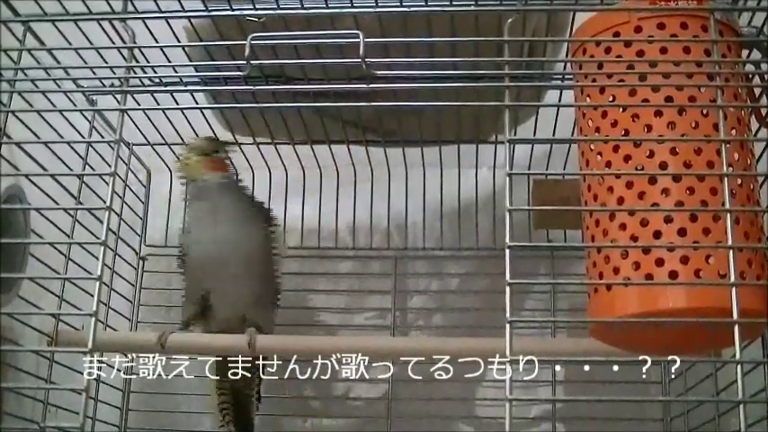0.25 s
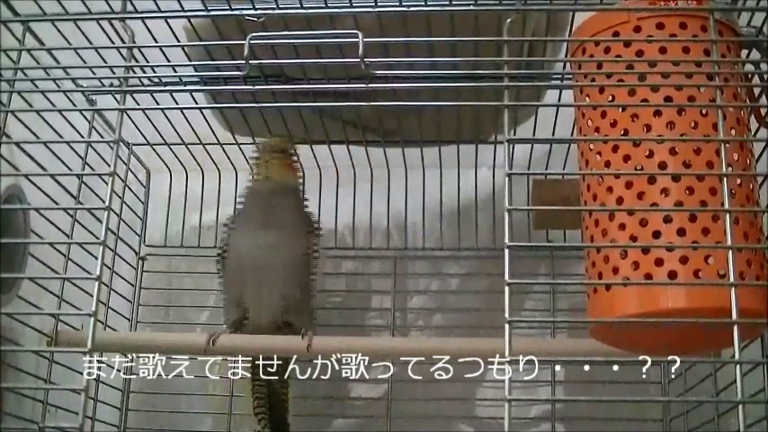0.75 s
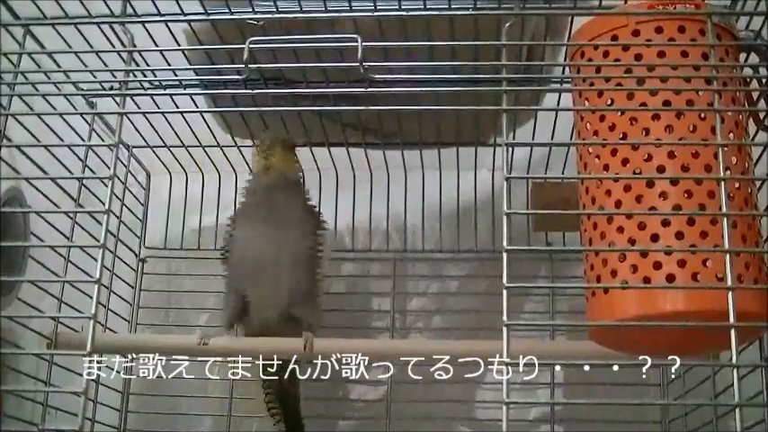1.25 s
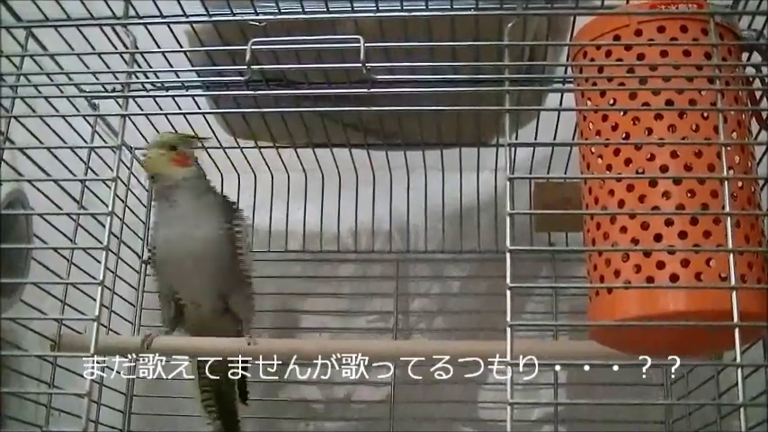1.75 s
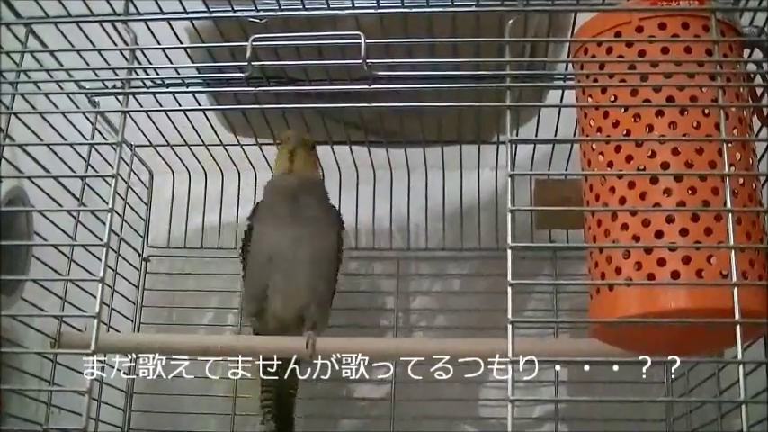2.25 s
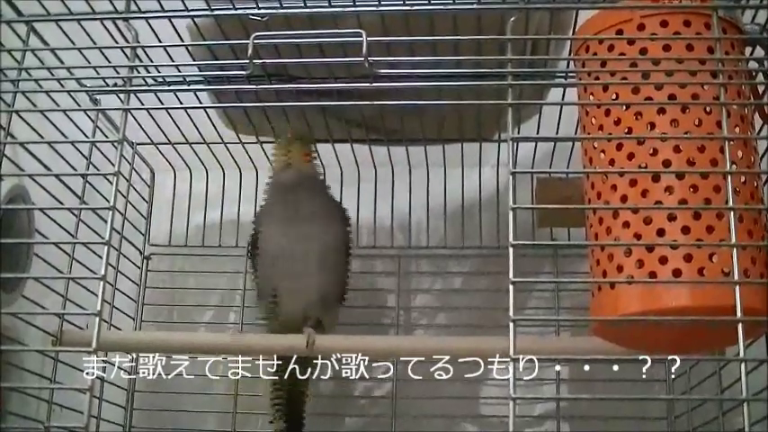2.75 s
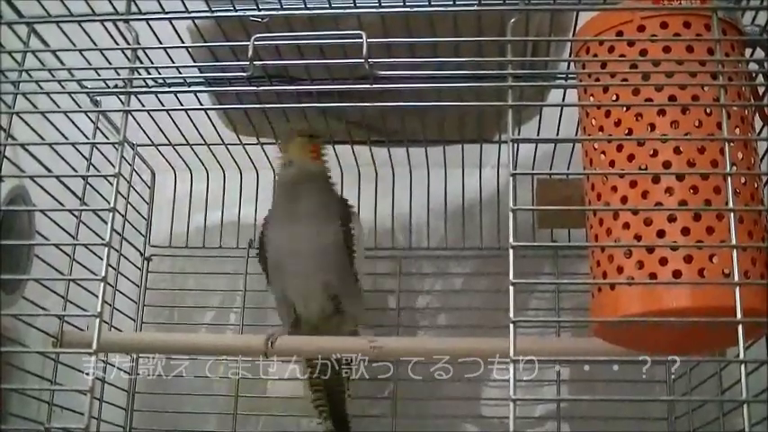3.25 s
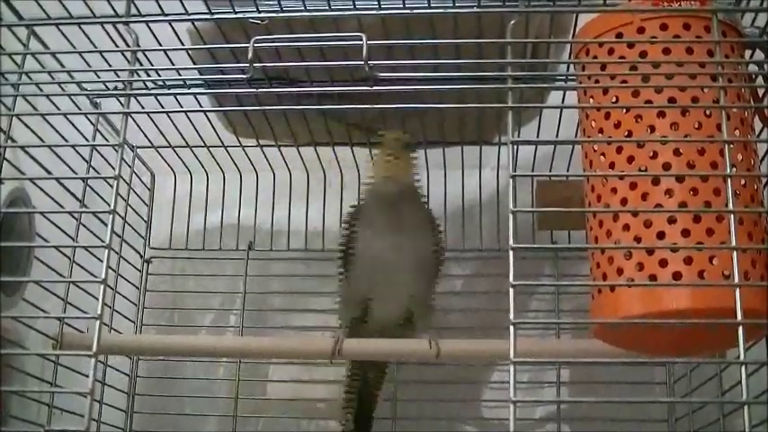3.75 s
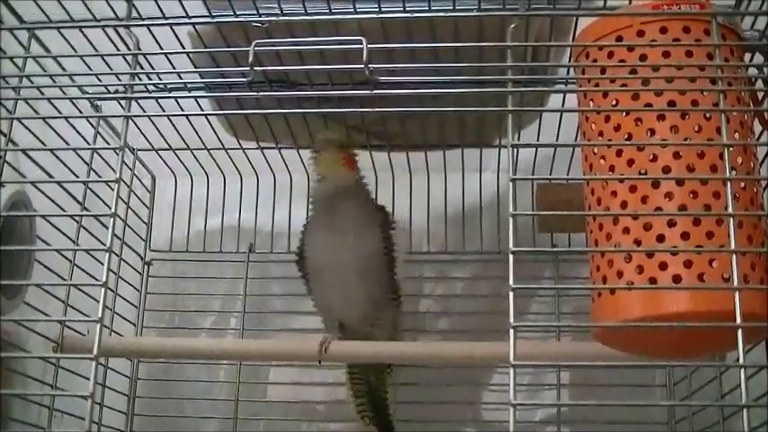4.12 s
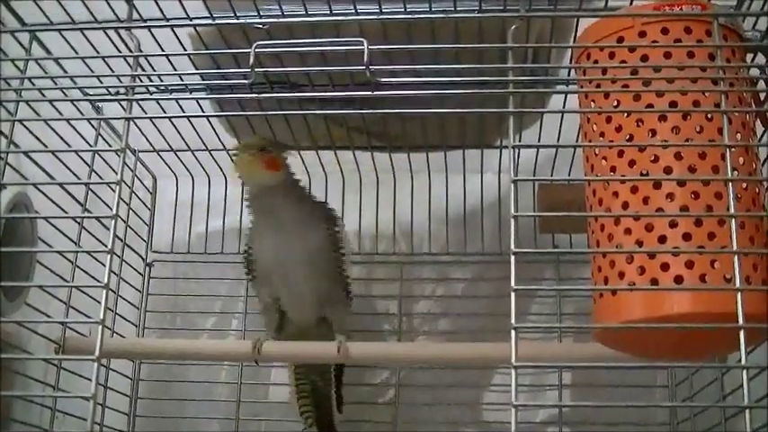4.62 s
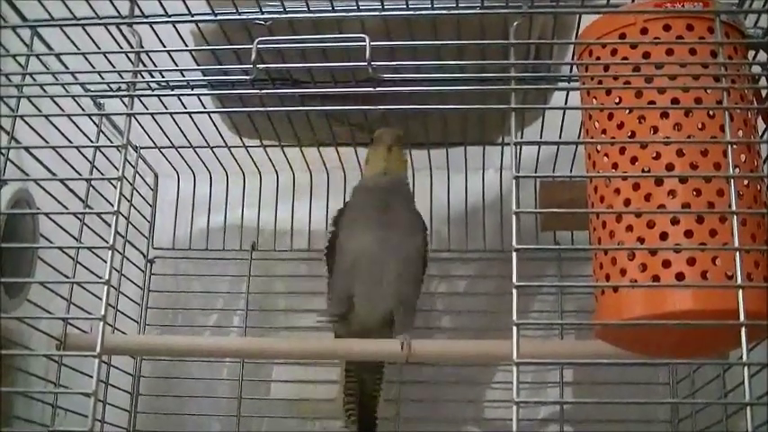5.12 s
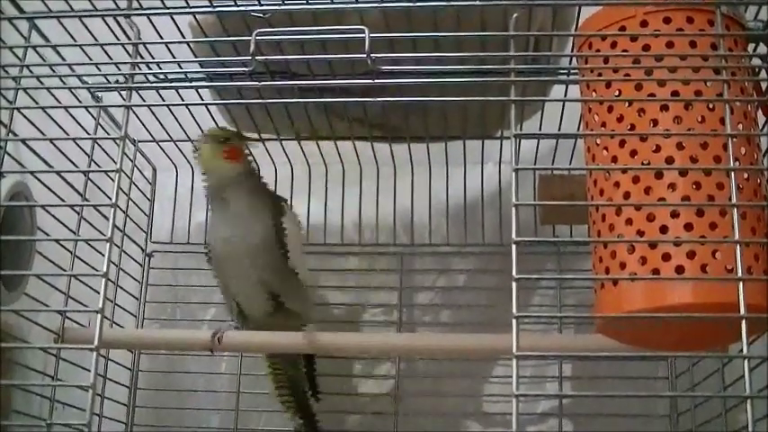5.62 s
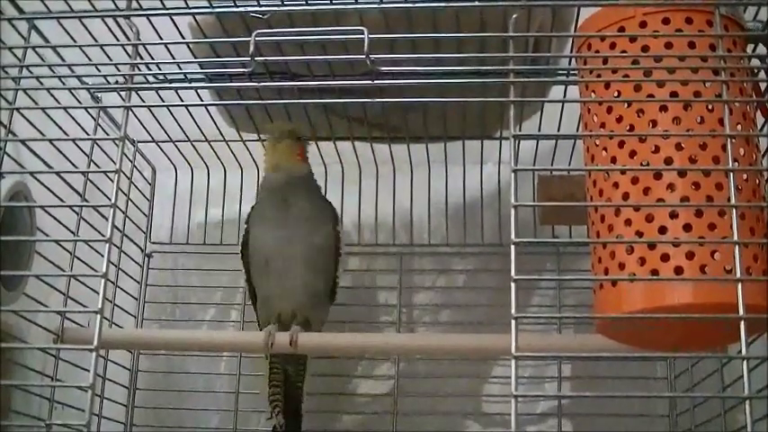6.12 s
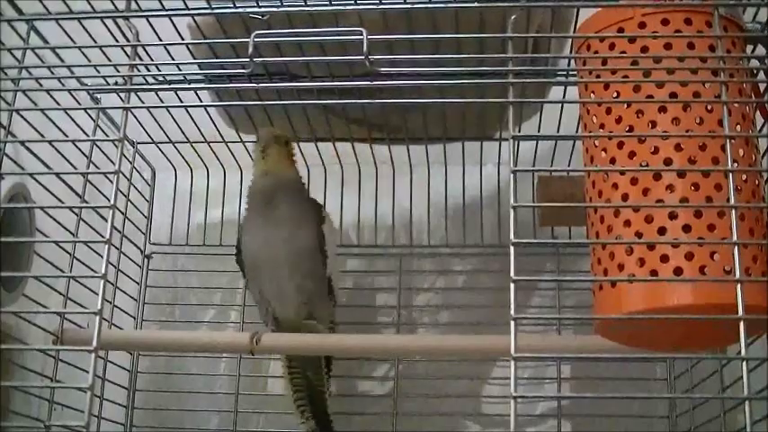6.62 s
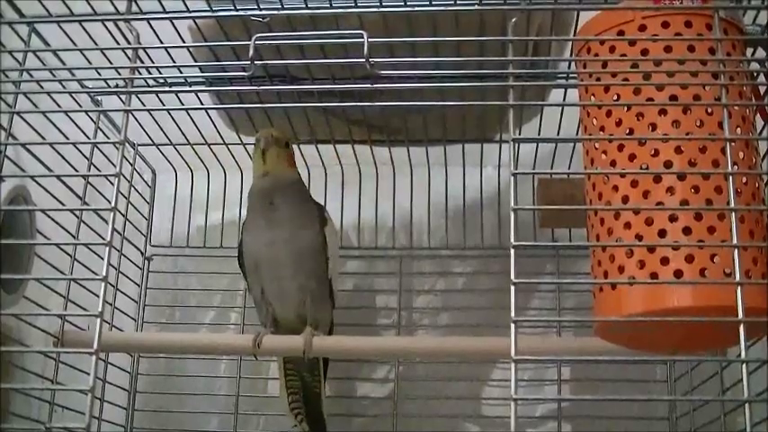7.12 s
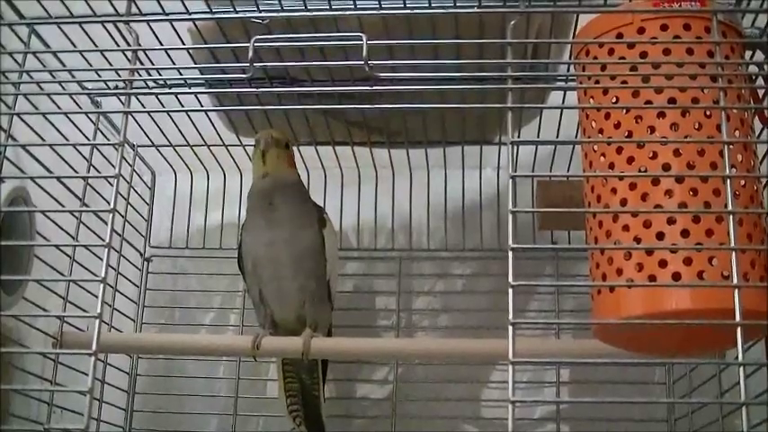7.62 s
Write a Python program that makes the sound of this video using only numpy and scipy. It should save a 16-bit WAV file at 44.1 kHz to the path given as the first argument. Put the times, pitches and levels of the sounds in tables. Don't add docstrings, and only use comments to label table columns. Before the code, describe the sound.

Spaced single bird whistles, low and sliding at first, then higher and brighter with quick downward flicks, amid faint claw ticks and room hum.

```python
import sys
import numpy as np
from scipy import signal
from scipy.fft import rfft, irfft
from scipy.io import wavfile
from scipy.ndimage import uniform_filter1d

SR = 44100
rng = np.random.default_rng(int(sys.argv[2]) if len(sys.argv) > 2 else 0)


def to_wav(s):
    ch = np.atleast_2d(s).T
    pcm = np.round(np.clip(ch, -1, 1) * 32767)
    wavfile.write(sys.argv[1], SR, pcm.astype(np.int16))


def undo_db(level):
    steps = np.asarray(level, float) / 20
    return 10 ** steps


N = 347177


def rms_one(x):
    return x / np.sqrt(np.mean(x ** 2, axis=-1, keepdims=True) + 1e-20)


def at_hz(points, hz):
    point_hz, value = np.array(points).T
    return np.interp(np.log(hz), np.log(point_hz), value)


def bump(t, at_s, half_width_s):
    return np.exp(-.5 * ((t - at_s) / half_width_s) ** 2)


def drift(rate_hz, count):
    r = np.exp(-2 * np.pi * rate_hz / SR)
    wander = signal.lfilter([1], [1, -2 * r, r * r], rng.standard_normal(16000))
    return rms_one(wander[3000:3000 + count])


def resonance(x, hz, width_hz):
    r = np.exp(-np.pi * width_hz / SR)
    return signal.lfilter([1, 0, -1], [1, -2 * r * np.cos(2 * np.pi * hz / SR), r * r], x)


def bird():
    # start_s, pitch_hz, level_db
    low_slides = [
        [(1.875, 1281, -34), (1.9, 1391, -37.5), (1.954, 1782, -19), (1.986, 1998, -21.5), (2.03, 2008, -20.5),
         (2.07, 1925, -17), (2.116, 1889, -23)],
        [(2.402, 2405, -27), (2.424, 2254, -22), (2.436, 2227, -17), (2.455, 2183, -13.5), (2.49, 2101, -14),
         (2.517, 2108, -16.5)],
        [(2.812, 2337, -22), (2.832, 2156, -12.5), (2.865, 1962, -19.5), (2.885, 1925, -15.5),
         (2.944, 1930, -20)],
        [(3.656, 2040, -21), (3.692, 2058, -15), (3.75, 1974, -17.5), (3.785, 1929, -19), (3.8, 2088, -21)],
    ]
    held_notes = [
        [(3.214, 2580, -16.5), (3.235, 2443, -9.5), (3.246, 2506, -20), (3.266, 2467, -20)],
        [(4.115, 2655, -19), (4.152, 2488, -31), (4.159, 2526, -17.5), (4.19, 2630, -22.5), (4.234, 2540, -21),
         (4.239, 2463, -11), (4.272, 2009, -20), (4.288, 1513, -34)],
        [(4.502, 2626, -20), (4.534, 2460, -16.5), (4.565, 2458, -18), (4.622, 2580, -12), (4.648, 2498, -28.5)],
        [(4.91, 2454, -15), (4.95, 2380, -15), (4.98, 2418, -9), (5.003, 2367, -18.5), (5.024, 2362, -11),
         (5.056, 2004, -23)],
    ]
    arches = [
        [(5.286, 2390, -13), (5.325, 2377, -10.5), (5.345, 2416, -11), (5.372, 2766, -15.5), (5.402, 2425, -32)],
        [(5.703, 2401, -24), (5.752, 2439, -15), (5.784, 2680, -18.5), (5.812, 2765, -15), (5.896, 2590, -14),
         (5.905, 2466, -27.5)],
        [(6.183, 2361, -19.5), (6.226, 2260, -21.5), (6.25, 2459, -12.5), (6.292, 2518, -14.5),
         (6.32, 2404, -20.5), (6.342, 2128, -14), (6.357, 2137, -25.5)],
    ]
    # overtones_db, gain_start_to_end_db, mid_swell_db, treble_db_per_octave, tremor_share
    voices = [(-5, -6, 17, -6, .008), (-1, -8, -3.5, -8, .0141), (0.5, -1.5, -4, -5, .015),
              (-3.5, 12, -2.5, 2.5, .012), (-17, 8, 21.5, -6.5, 0.011), (0.5, -5, -2.5, 3, 0.014),
              (-6.5, 5, 7, 2.5, 0.01), (-2.5, 5.5, -5, 5, 0.0087), (-5.5, 2.5, -2.5, 6, 0.018),
              (-6.5, -0.5, 2, 8, 0.0057), (0.5, -2.5, -7.5, 11.5, 0.0046)]
    # length_s, last_pitch_hz, level_step_db
    flicks = [(0.015, 1900, -13), (0.0079, 1750, -5.5), (0.019, 1720, -9.5), (0.0088, 2300, -17),
              (0.0052, 2100, 2), (0.00086, 1400, -1), (0.01094, 1700, 2), (0.0095, 1600, 0),
              (0.0081, 2100, 6.5), (0.013, 1800, 2), (0.0075, 1612, 0.5)]
    out = np.zeros(N)
    for rows, voice, flick in zip(sorted(low_slides + held_notes + arches), voices, flicks):
        first, sound = call(rows, voice, flick)
        out[first:first + len(sound)] = sound
    return signal.sosfilt(signal.butter(3, 1050, "high", fs=SR, output="sos"), out)


def call(rows, voice, flick):
    # start_s, length_s, share
    doubling = [(1.89, .012, 0.15), (3.214, .014, 0.15), (4.115, .1, 0.04), (4.503, .022, 0.1),
                (4.912, .02, 0.03), (5.705, .022, 0.08)]
    # at_s, half_width_s, depth
    rasps = [(1.898, 0.0036, 0.45), (1.979, 0.025, 0.088), (3.26, 0.0093, 0.11), (4.12, .004, 0.4),
             (4.157, .004, 0.52), (4.2, .012, 0.059), (4.51, .006, .1), (4.966, .012, 0.08),
             (6.236, .005, 0.067)]
    start_s, end_s = rows[0][0], rows[-1][0]
    first, t, hz, level_db = contour(rows, flick)
    hz = hz * (1 + voice[-1] * drift(90, len(t)))
    phase = 2 * np.pi * np.cumsum(hz) / SR

    half = 0
    for at_s, length_s, share in doubling:
        half = half + share * np.sin(np.pi * np.clip((t - at_s) / length_s, 0, 1)) ** .5
    tone = np.sin(phase) + half * undo_db(-16) * np.sin(phase / 2)
    tone = tone + overtones(t, start_s, end_s, hz, phase, level_db, half, voice)

    breath_db = -40
    rough = undo_db(breath_db) + 0.033 * bump(t, end_s + flick[0] / 2, .004)
    for at_s, half_width_s, depth in rasps:
        rough = rough + depth * bump(t, at_s, half_width_s)
    tone = tone * (1 + rough * drift(430, len(t)))
    edge = np.clip(np.minimum((t - t[0]) / 0.002, (t[-1] - t) / 0.005), 0, 1)
    return first, np.sqrt(2) * undo_db(level_db) * edge * tone


def contour(rows, flick):
    # at_s, drop_hz, half_width_s, dip_db
    gulps = [(1.976, 222, 0.0037, -12.5), (1.999, 342.5, .005, -14), (2.021, 207.4, .0035, 2),
             (2.46, 59.6, 0.0052, 5), (2.471, 46.05, 0.002, -7), (2.863, 49.8, .003, 1.5),
             (3.25, 573, .0026, -5), (3.263, 517, 0.0024, -6.5), (4.253, 108.6, 0.0035, -8.5),
             (4.595, 60.3, 0.0015, -8.5), (4.606, 59.4, 0.0034, -10), (4.955, 169.3, .004, -9),
             (4.972, 222, 0.0035, -5.5), (6.232, 259.1, .004, -4)]
    # at_s, half_width_s, dip_db
    breaks = [(2.507, 0.0036, -3), (2.843, 0.0018, -6), (2.868, .003, -3), (3.709, 0.0029, -15),
              (3.722, 0.0027, -13.5), (3.737, 0.0016, -8.5), (3.792, 0.0024, -12), (4.129, 0.0068, -12),
              (4.175, 0.0071, -13), (4.206, 0.0061, -11), (4.532, .0039, -10.5), (4.641, 0.0045, -6),
              (5.033, .002, -12), (5.348, .0073, -13.5), (5.768, 0.0022, -10), (5.791, .003, -10),
              (5.845, .0052, -15), (6.262, 0.006, -21.5), (6.277, 0.0046, -10)]
    scoop_s, scoop_share, scoop_db, fade_db = .014, 0.066, -15.5, -5
    flick_s, last_hz, flick_db = flick
    start_s, aim_hz, aim_db = rows[0]
    end_s, end_hz, end_db = rows[-1]
    scoop = [(start_s, aim_hz * (1 - scoop_share), aim_db + scoop_db),
             (start_s + scoop_s, aim_hz, aim_db)]
    slack = [(end_s + flick_s / 4, min(1.15 * last_hz, end_hz), end_db + flick_db),
             (end_s + flick_s, last_hz, end_db + flick_db + fade_db)]
    point_s, point_hz, point_db = np.transpose(scoop + list(rows[1:]) + slack)

    first = round(point_s[0] * SR)
    t = np.arange(first, round(point_s[-1] * SR)) / SR
    hz = uniform_filter1d(np.interp(t, point_s, point_hz), size=110, mode="nearest")
    level_db = np.interp(t, point_s, point_db)
    for at_s, drop_hz, half_width_s, dip_db in gulps:
        catch = bump(t, at_s, half_width_s)
        hz = hz - drop_hz * catch
        level_db = level_db + dip_db * catch
    for at_s, half_width_s, dip_db in breaks:
        level_db = level_db + dip_db * bump(t, at_s, half_width_s)
    return first, t, hz, level_db


def overtones(t, start_s, end_s, hz, phase, level_db, half, voice):
    # overtone_hz, level_re_fundamental_db
    throat = [(2400, -1.5), (3100, -4.5), (3800, -13), (4300, -14), (5200, -25.5), (6200, -30), (7000, -27),
              (7700, -26), (8500, -39), (9600, -43.5), (11500, -39), (13500, -37.5), (15500, -48)]
    bright_db, gain_db, swell_db, treble_db, _ = voice
    scoop_dull_db, dull_share = -10, .11
    along = np.clip((t - start_s) / (end_s - start_s), 0, 1)
    after_end = t > end_s
    bright_db = bright_db + gain_db * (along - .5) + swell_db * np.sin(np.pi * along) - 3 * after_end
    bright_db = bright_db + scoop_dull_db * np.clip(1 - along / dull_share, 0, 1) ** .5
    treble_db = treble_db - 12 * after_end
    weak_db = np.minimum(level_db + 35.5, 0)

    out = np.zeros(len(t))
    for k in np.arange(3, 21) / 2:
        line_hz = k * hz
        octaves = np.clip(np.log2(line_hz / 7800), 0, 1)
        line_db = at_hz(throat, line_hz) + bright_db + treble_db * octaves + 0.014 * k * weak_db
        line_db = line_db + 2.84 * drift(40, len(t))
        size = undo_db(line_db) * (line_hz < 15600)
        if k % 1:
            size = size * half * undo_db(15.5)
        out += size * np.sin(k * phase + rng.uniform(0, 2 * np.pi))
    return out


def claws():
    # start_s, peak_db, centre_hz, width_hz, t60_s
    ticks = [
        (0.025, -54.5, 1650, 1110, 0.16),
        (0.608, -60, 4500, 2500, 0.033),
        (2.805, -48.5, 3200, 2550, 0.078),
        (3.908, -61, 6000, 7900, 0.12),
        (7.454, -65.5, 2800, 3000, 0.062),
    ]
    out, t = np.zeros(N), np.arange(6000) / SR
    for start_s, peak_db, hz, width_hz, t60_s in ticks:
        burst = rms_one(resonance(rng.standard_normal(len(t)), hz, width_hz))
        burst = burst * undo_db(-60 * t / t60_s) * np.clip(t / 0.0018, 0, 1)
        first = round(start_s * SR)
        out[first:first + len(t)] += undo_db(peak_db) * burst
    return out


def room(x):
    # centre_hz, t60_s
    decay = [(1500, 0.31), (3000, 0.29), (6000, 0.24), (12000, .18)]
    # delay_s, level_db
    echoes = [(.009, -24), (.017, -17.5), (.029, -12.5), (.041, -14.5)]
    room_db, side_db = -0.5, -19
    t = np.arange(round(.6 * SR)) / SR
    white, tail = rng.standard_normal((2, len(t))), 0
    for hz, t60_s in decay:
        band_filter = signal.butter(2, [hz / 1.42, hz * 1.42], "band", fs=SR, output="sos")
        tail = tail + signal.sosfilt(band_filter, white) * undo_db(-60 * t / t60_s)
    onset = np.clip((t - .002) / 0.0049, 0, 1)
    tail = tail * onset * (1 + 3.9 * undo_db(-60 * t / 0.043))
    mid, side = signal.fftconvolve(x[None], tail / np.sqrt(.35 * SR / 14), axes=1)[:, :N]
    dull = signal.sosfilt(signal.butter(1, 4500, fs=SR, output="sos"), x)
    for delay_s, level_db in echoes:
        mid = mid + undo_db(level_db) * np.roll(dull, round(delay_s * SR))
    return undo_db(room_db) * (mid + undo_db(side_db) * side * np.array([[1], [-1]]))


def room_tone():
    # freq_hz, density_db_per_hz
    air_curve = [(15, -49), (25, -28), (48, -28.5), (70, -9), (133, -10), (199, -0.5), (584, -14),
                 (744, -15), (898, -15.5), (2710, -22.5), (3020, -20.5), (3950, -29.5), (4640, -27.5),
                 (14000, -36.5), (15600, -44)]
    # freq_hz, likeness
    likeness = [(60, 0.93), (180, 0.998), (550, 0.94), (1650, 0.87), (4970, 0.74), (15000, 0.84)]
    # centre_hz, width_hz, level_db
    hum_bands = [(80, 2.2, -72), (159.7, 13, -68.5), (196.7, 13, -66.5), (251.9, 6.9, -68.5),
                 (315.8, 37, -74.5), (745, 65, -74), (3010, 110, -76), (4500, 690, -72.5), (4970, 250, -78),
                 (6000, 97, -82.5)]
    air_db = -54
    hz = np.maximum(np.fft.rfftfreq(N, 1 / SR), 1)
    alike = np.clip(at_hz(likeness, hz), 0, 1)
    colour = undo_db(at_hz(air_curve, hz)) / (1 + (hz / 15100) ** 40)
    mid, side = rfft(rng.standard_normal((2, N))) * colour
    air = irfft(np.sqrt(1 + alike) * mid + np.sqrt(1 - alike) * side * np.array([[1], [-1]]), N)
    white, hum = rng.standard_normal(N), 0
    for centre_hz, width_hz, level_db in hum_bands:
        band = resonance(resonance(white, centre_hz, width_hz), centre_hz, width_hz)
        hum = hum + undo_db(level_db) * rms_one(band)
    return undo_db(air_db - 3.5) * rms_one(air) + hum


def limiter(x):
    window_s, ceiling_db, knee = .0012, -14, 4.0
    power = uniform_filter1d(np.mean(x ** 2, axis=0), size=max(round(window_s * SR), 3))
    level = np.sqrt(power + 1e-12)
    return x / (1 + (level / undo_db(ceiling_db)) ** knee) ** (1 / knee)


def masking(x):
    # freq_hz, level_re_loudest_band_db
    mask_curve = [(600, -57), (2000, -72), (4500, -67), (6000, -52), (12000, -58.5)]
    duck_db, scatter_db = -16, 2.5
    hz, _, z = signal.stft(x, SR, nperseg=2048, noverlap=1536)
    power = uniform_filter1d(np.abs(z.mean(0)) ** 2, size=12, axis=0)
    chance = rng.standard_normal((2,) + power.shape)
    patchy = uniform_filter1d(chance[0], size=16, axis=0)
    patchy = rms_one(uniform_filter1d(patchy, size=3, axis=1))
    threshold_db = at_hz(mask_curve, hz + 1)[:, None] + scatter_db * patchy
    masked = (power < power.max(0) * undo_db(2 * threshold_db)) & (hz[:, None] > 450)
    blur_db = at_hz([(1000, -35.5), (4000, -23.5), (12000, -3.5)], hz + 1)
    z = z * (1 + undo_db(blur_db)[:, None] * chance[1]) * np.where(masked, undo_db(duck_db), 1)
    return signal.istft(z, SR, nperseg=2048, noverlap=1536)[1][:, :N]


def scene():
    near = bird() + claws()
    head_pan_db = 1.1 * np.array([[.5], [-.5]])
    return (near + room(near)) * undo_db(head_pan_db) + room_tone()


def top_cut(x):
    return signal.sosfilt(signal.butter(12, 15750, fs=SR, output="sos"), x)


def record(dry):
    mix = masking(limiter(dry))
    return top_cut(mix)


dry = scene()
out = record(dry)
to_wav(out)
```